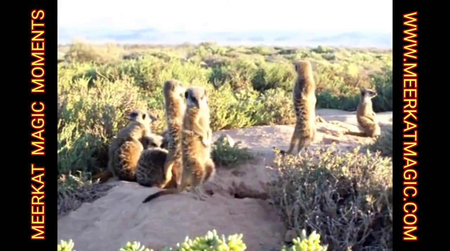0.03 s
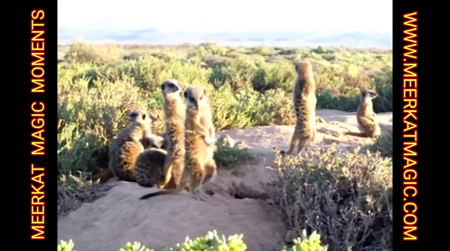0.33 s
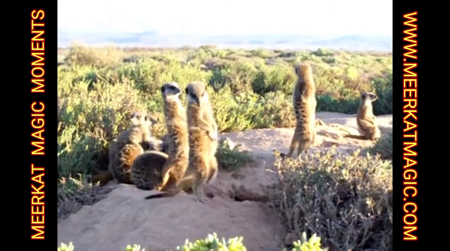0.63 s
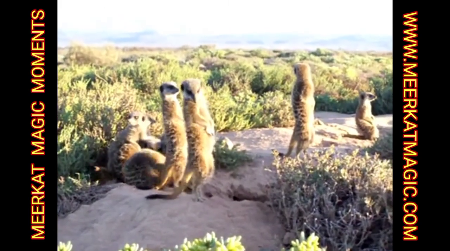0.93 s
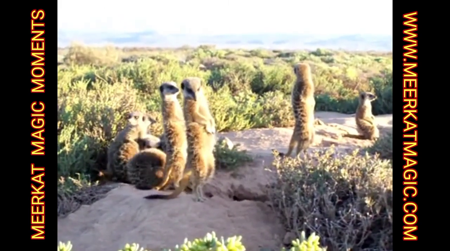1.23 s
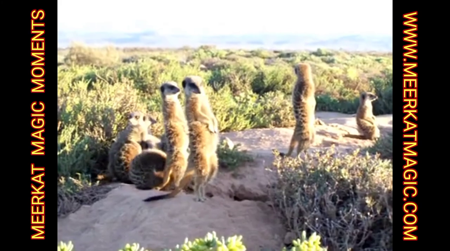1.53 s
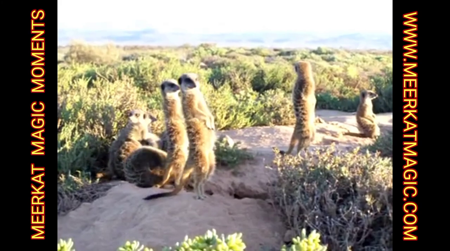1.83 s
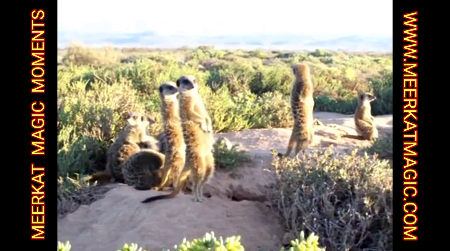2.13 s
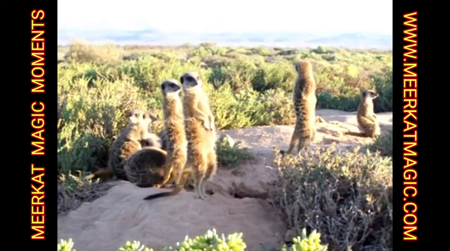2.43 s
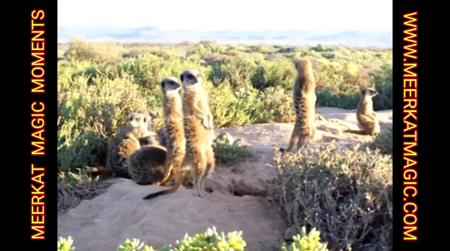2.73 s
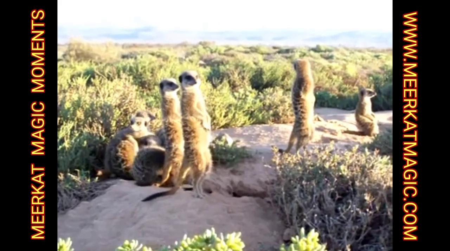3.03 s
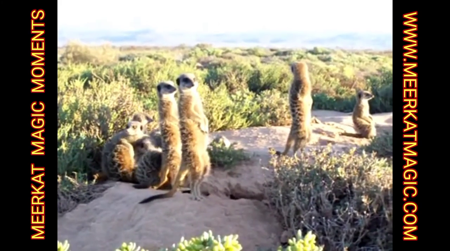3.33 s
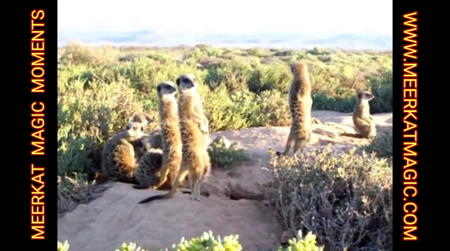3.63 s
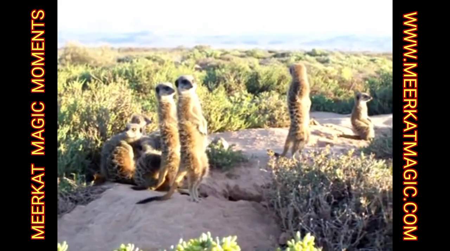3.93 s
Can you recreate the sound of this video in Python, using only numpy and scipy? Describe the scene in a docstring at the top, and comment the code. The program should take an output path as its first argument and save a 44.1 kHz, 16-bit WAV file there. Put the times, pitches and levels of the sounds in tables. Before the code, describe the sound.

Quavering, hoarse meerkat growls overlap with gliding whines and a few high peeps in the open air. Under them runs a soft hiss, while wind hits the microphone in single puffs, then in a loud rumbling gust with a closing thump.

```python
"""At a sandy burrow, young meerkats whine, growl and peep over one another.
Each whine or growl is an arch of pitch with a fast, hoarse quaver, shaped by throat and mouth.
Wind buffets the microphone, in single puffs at first, then in a strong gust that ends with a thump.
A soft outdoor hiss lies under it all."""
import sys
import numpy as np
from scipy import signal
from scipy.fft import rfft, irfft, next_fast_len
from scipy.io import wavfile
from scipy.ndimage import map_coordinates

SR = 44100
rng = np.random.default_rng(int(sys.argv[2]) if len(sys.argv) > 2 else 0)


def generate_wav(signal):
    """Clip the signal to [-1, 1] and save it as 16-bit WAV at the path in sys.argv[1]."""
    frames = np.transpose(np.atleast_2d(signal))
    scaled = np.clip(frames, -1, 1) * 32767
    pcm = np.round(scaled).astype(np.int16)
    wavfile.write(sys.argv[1], SR, pcm)


N = 176400  # 4 seconds
RASP_PER_S = 480  # how fast a voice's roughness changes


def amp(db):
    """Turn decibels into a number to multiply by."""
    return 10 ** (np.asarray(db) / 20)


def along(points, hz):
    """Read between (frequency_hz, value) points, with octaves evenly spaced."""
    point_hz, values = np.transpose(points)
    return np.interp(np.log(hz + 1), np.log(point_hz + 1), values)


def wobble(rate, n):
    """A smooth random curve, n samples long, through rate random values a second."""
    return map_coordinates(rng.standard_normal(1024), [np.arange(n) * rate / SR], mode="wrap")


def filtered(x, tone):
    """Turn each frequency up or down along a curve of (frequency_hz, gain_db) points."""
    size = next_fast_len(N + SR // 2)
    gain = amp(along(tone, np.fft.rfftfreq(size, 1 / SR)))
    return irfft(rfft(x, size) * gain, size)[:N]


def noise(tone):
    """Noise shaped by a tone curve, at an average strength (rms) of 1."""
    shaped = filtered(rng.standard_normal(N), tone)
    return shaped / np.sqrt(np.mean(shaped ** 2) + 1e-20)


def add(track, start_s, sound):
    """Mix a sound into the track at start_s."""
    part = track[max(0, round(start_s * SR)):][:len(sound)]
    part += sound[:len(part)]


def voice(arch_hz, level_db, throat, quaver, rasp, mouth_db, bright_db=0, lowest_db=0):
    """A fast tremor shakes pitch and level; harmonics (multiples of the pitch) pass throat and mouth."""
    n = len(arch_hz)
    tremor_hz = 62 * (1 + 0.15 * wobble(62, n))
    tremor = np.sqrt(2) * np.sin(2 * np.pi * np.cumsum(tremor_hz) / SR)
    jitter = 0.5 * wobble(220, n)
    pitch_hz = arch_hz * (1 + quaver * (tremor + jitter))
    phase = 2 * np.pi * np.cumsum(pitch_hz) / SR
    mouth_hz, mouth_width_hz = 2610 + 2.47 * arch_hz, 610  # the mouth rings higher as the pitch rises
    out = np.zeros(n)
    for k in range(1, 11):
        mouth = amp(mouth_db) * np.exp(-((k * arch_hz - mouth_hz) / mouth_width_hz) ** 2)
        tilt_db = lowest_db if k == 1 else bright_db * np.log2(k / 2)
        gain = (amp(along(throat, k * pitch_hz)) + mouth) * amp(tilt_db)
        clean_share = np.exp(-rasp * k)  # higher harmonics are raspier
        smooth = np.sin(k * phase)
        hoarse = wobble(RASP_PER_S, n) * smooth + wobble(RASP_PER_S, n) * np.cos(k * phase)
        out += gain * (np.sqrt(2 * clean_share) * smooth + np.sqrt(1 - clean_share) * hoarse)
    return out * amp(level_db + tremor)


def whines():
    """Clear, bright calls that glide in pitch and drop at the end."""
    # The path of each whine, as points: time_s, pitch_hz, level_db
    curves = [
        [(0, 1191, -50), (.036, 1114, -47.5), (.06, 907, -49), (.1, 640, -56)],
        [(.79, 602, -65), (.89, 775, -55.5), (.96, 911, -58), (1.05, 890, -52), (1.1, 620, -60)],
        [(1.505, 620, -63), (1.525, 669.5, -49.5), (1.56, 774, -48), (1.62, 1024, -48.5), (1.74, 1134, -49.5),
         (1.91, 1089, -49.5), (1.93, 1000, -57)],
        [(2.76, 593, -52), (2.81, 704, -51), (2.97, 871, -53), (3.04, 954, -48.5), (3.19, 1005, -50),
         (3.27, 959, -48), (3.32, 704, -52.5)],
    ]
    # How the throat colours a whine: frequency_hz, gain_db
    throat = [(1000, -6.5), (1400, 3), (1900, -1.5), (2300, -0.5), (2600, -6), (3300, -3.5), (3900, -13),
              (4600, -8), (6000, -26), (9000, -48)]
    out = np.zeros(N)
    for curve in curves:
        time_s, pitch_hz, level_db = np.transpose(curve)
        t = np.arange(time_s[0], time_s[-1], 1 / SR)
        arch_hz = np.interp(t, time_s, pitch_hz)
        swell_db = np.interp(t, time_s, level_db)
        add(out, time_s[0], voice(arch_hz, swell_db, throat, quaver=0.015, rasp=0.023, mouth_db=-4.5))
    return out


def growls():
    """Lower, hoarse calls: the pitch settles, then sags at the end."""
    # One growl a row: start_s, length_s, start_hz, settled_hz, level_db, quaver (share of the pitch),
    # bright_db (per octave), lowest_db (gain of the lowest harmonic)
    calls = [ (0.043, 0.099, 626, 656, -49.5, 0.038, 0, 1), (0.109, 0.44, 780, 912, -44.5, 0.073, -5, 1),
             (0.189, 0.45, 700, 744, -54, 0.09, 1, 4), (0.619, 0.15, 659, 699, -50, 0.032, -2, -13),
             (1.05, 0.38, 700, 847, -50, 0.061, 2.5, 2.5), (1.16, 0.15, 640, 691.6, -49, 0.026, -0.5, 2.5),
             (1.264, .155, 742, 817, -42, 0.0536, -5.5, -6), (1.403, 0.29, 850, 921, -50, .03, -4, -2),
             (1.9, .46, 700, 860.6, -52, 0.066, 1.5, 2), (1.901, 0.44, 700, 740.3, -49, 0.057, -2, -10),
             (2.358, 0.29, 896, 1012, -64.5, 0.077, -19, 18),
             (2.47, .29, 700, 801, -50.5, 0.028, -17, -6.5), (2.726, .145, 804, 714, -44, 0.035, -13, -9),
             (2.91, 0.3, 790, 925, -42.5, 0.046, -7.5, -5), (3.149, .23, 620, 763, -47.5, 0.045, -4.5, -3),
             ]
    # How the throat colours a growl: frequency_hz, gain_db
    throat = [(550, 7), (900, -2), (1150, -4), (1380, 2.5), (1800, -1.5), (2300, -4), (2700, -7.5),
              (3200, -10.5), (3900, -19), (5500, -17), (9000, -37.5)]
    fade_in_s, fade_out_s = 0.018, 0.021
    out = np.zeros(N)
    for start_s, length_s, start_hz, settled_hz, level_db, quaver, bright_db, lowest_db in calls:
        t = np.arange(0, length_s, 1 / SR)
        progress = t / length_s
        sag = 0.5 * length_s * progress ** 8  # longer growls sag further
        arch_hz = settled_hz * (1 - sag) + (start_hz - settled_hz) * (1 - progress) ** 3
        fade = np.clip(np.minimum(t / fade_in_s, (length_s - t) / fade_out_s), 0, 1)
        call = voice(arch_hz, level_db, throat, quaver, rasp=7.7 * quaver, mouth_db=-10.5,
                     bright_db=bright_db, lowest_db=lowest_db)
        add(out, start_s, fade * call)
    return out


def ground_echo(calls):
    """Sand and low bushes scatter the calls into a very short echo."""
    t = np.arange(SR // 4) / SR
    tail = rng.standard_normal(len(t)) * amp(-60 * t / 0.17)  # falls 60 dB in 0.17 s
    return signal.fftconvolve(calls, tail / np.linalg.norm(tail))[:N]


def hiss():
    """A soft, steady outdoor hiss."""
    # The tone of the hiss: frequency_hz, gain_db
    tone = [(390, -2.5), (580, -0.5), (800, -2.5), (1100, -7.5), (1400, -6), (2400, -13.5), (4800, -14),
            (7100, -17.5), (8500, -31.5), (10100, -30.5)]
    return amp(-45) * noise(tone)


def wind():
    """Gusts swell over a breeze; stronger wind adds smaller swirls of air, which rumble higher."""
    # Swells of wind: peak_s, half_length_s, level_db
    gusts = [(0.264, 0.049, -28.5), (0.483, 0.11, -28), (0.643, 0.073, -32), (0.935, 0.021, -34),
             (1.866, 0.2, -33), (2.22, 0.27, -33), (2.851, 0.069, -21.5), (3.042, 0.052, -15.5),
             (3.176, 0.055, -22.5), (3.343, 0.041, -10.5), (3.451, 0.039, -13.5), (3.645, 0.054, -15.5),
             (3.848, 0.042, -16), (3.959, 0.027, -15.5)]
    # Big, then small swirls: offset_db (at full gust), growth (dB per dB of wind),
    # tone as points of frequency_hz, gain_db
    swirls = [(-3, 0.76, [(10, -7), (30, 1.5), (70, 1), (120, -11), (170, -19.5), (450, -68)]),
              (-3, 1.61, [(50, -9), (110, 3.5), (160, -0.5), (310, -16.5), (400, -28), (1500, -82)])]
    breeze_db, full_gust_db = -38, -14.5
    t = np.arange(N) / SR
    power = amp(breeze_db) ** 2
    for peak_s, half_length_s, level_db in gusts:
        power += amp(level_db) ** 2 * np.exp(-((t - peak_s) / half_length_s) ** 2)
    flutter_db = 1.5 * wobble(43, N)
    wind_db = 10 * np.log10(power) - full_gust_db + flutter_db
    return sum(amp(full_gust_db + offset_db + growth * wind_db) * noise(tone)
               for offset_db, growth, tone in swirls)


def peeps():
    """Short, thin, high calls: each is one sliding, trembling tone."""
    # One peep a row: start_s, length_s, start_hz, end_hz, level_db
    calls = [(0.276, 0.038, 2330, 2370, -42), (1.259, 0.073, 3600, 2990, -43),
             (1.367, 0.022, 3110, 2970, -40.5)]
    out = np.zeros(N)
    for start_s, length_s, start_hz, end_hz, level_db in calls:
        n = int(length_s * SR)
        pitch_hz = np.linspace(start_hz, end_hz, n) * (1 + 0.048 * wobble(RASP_PER_S, n))
        tone = np.sin(2 * np.pi * np.cumsum(pitch_hz) / SR)
        add(out, start_s, amp(level_db) * np.sqrt(np.hanning(n)) * tone)
    return out


def puffs():
    """Each puff of air pushes, then pulls on the microphone; the last two make the thump."""
    # One puff a row: middle_s, width_s, peak_db
    pushes = [(0.461, 0.0026, -11.5), (0.87, 0.0042, -21.5), (1.225, 0.0027, -15.5), (1.941, 0.0055, -16),
              (2.053, 0.0023, -18), (2.359, 0.0043, -22), (2.854, 0.0034, -13.5), (3.012, 0.0011, -6.5),
              (3.424, 0.0013, -6), (3.8616, 0.0013, 0), (3.8647, 0.00064, -5)]
    t = np.arange(N) / SR
    out = np.zeros(N)
    for middle_s, width_s, peak_db in pushes:
        offset = (t - middle_s) / width_s
        out -= amp(peak_db) * offset * np.exp((1 - offset ** 2) / 2)
    return out


def crackle(air):
    """The hardest pushes of air crackle faintly, and one small tick sounds during the strong gust."""
    # The tone of crackle and tick: frequency_hz, gain_db
    tone = [(1000, -8), (7000, -2.5), (9000, -19)]
    tick_s, tick_width_s = 3.1, 0.003
    t = np.arange(N) / SR
    tick = amp(-47) * np.exp(-((t - tick_s) / tick_width_s) ** 2) * noise(tone)
    return amp(-34) * air * np.abs(air) * noise(tone) + tick


def scene():
    """Calls, wind and hiss meet at one microphone."""
    calls = whines() + growls() + peeps()
    echo = amp(-9) * ground_echo(calls)
    air = wind() + puffs()
    return (calls + echo + air + crackle(air) + hiss() * amp(-45) / amp(-45))[None]


def record(dry):
    """The camera rounds off the highest peaks and keeps little of the highest treble."""
    # The camera's treble cut: frequency_hz, gain_db
    treble_cut = [(9000, 0), (9800, -23), (15400, -23), (15800, -80)]
    rounded = dry[0] / (1 + dry[0] ** 8) ** (1 / 8)
    return filtered(rounded, treble_cut)[None]


dry = scene()
out = record(dry)
generate_wav(out)
```